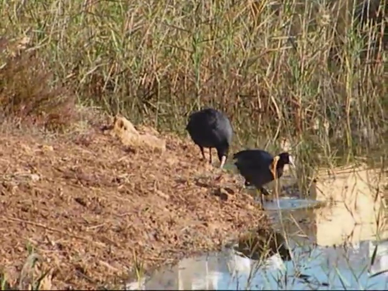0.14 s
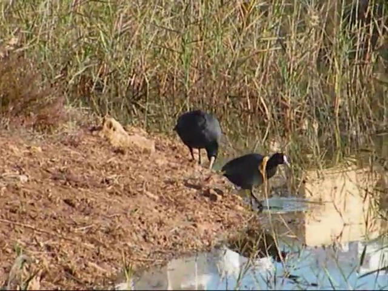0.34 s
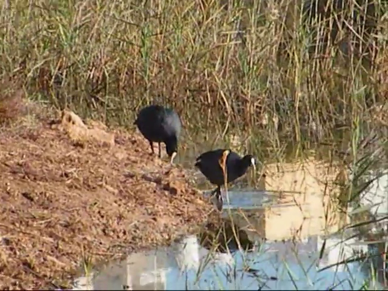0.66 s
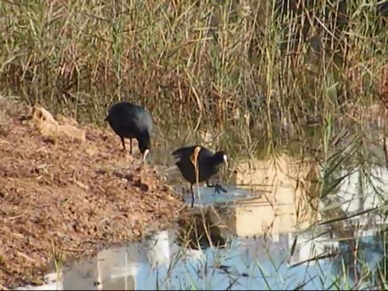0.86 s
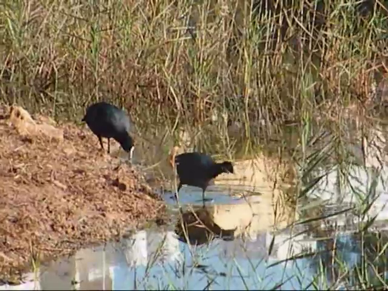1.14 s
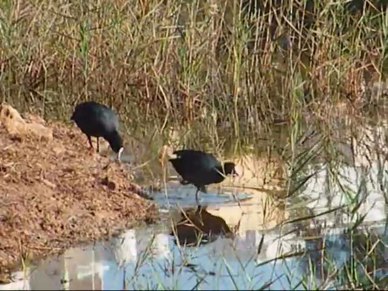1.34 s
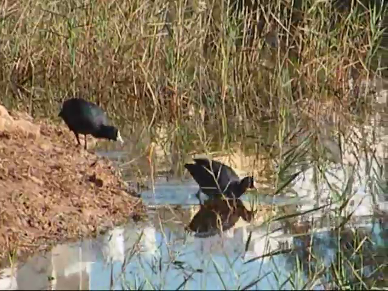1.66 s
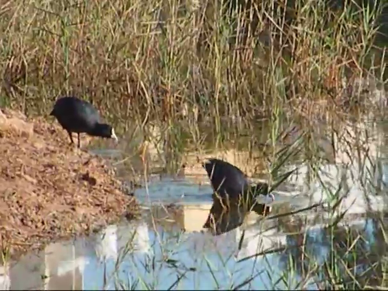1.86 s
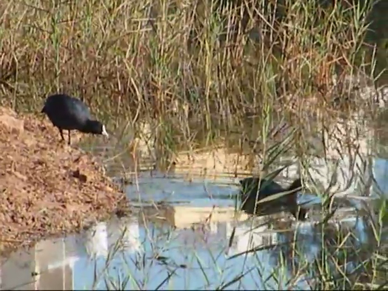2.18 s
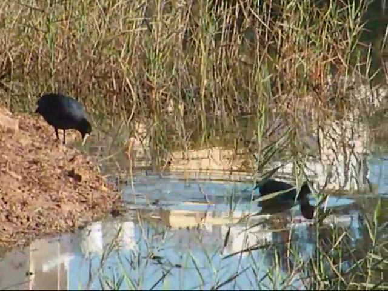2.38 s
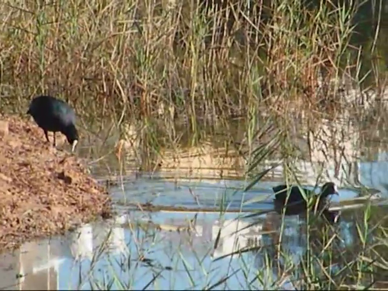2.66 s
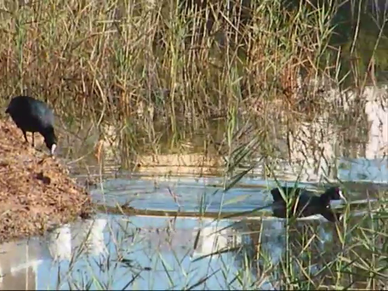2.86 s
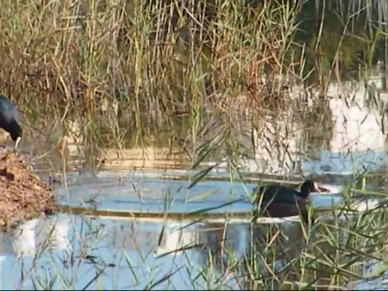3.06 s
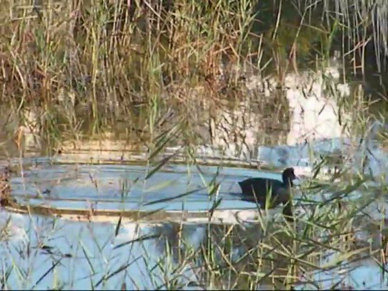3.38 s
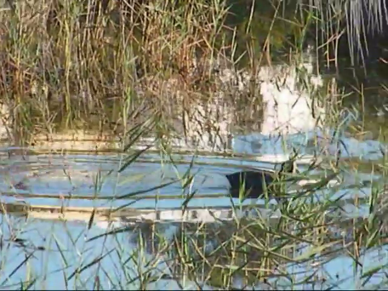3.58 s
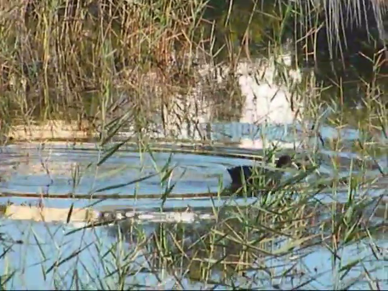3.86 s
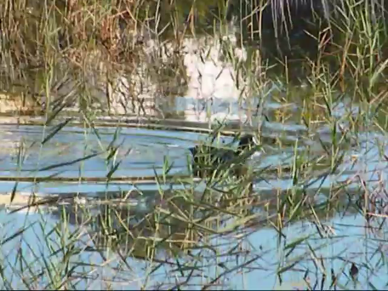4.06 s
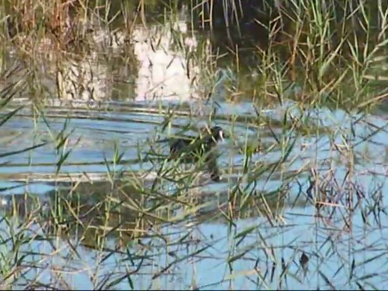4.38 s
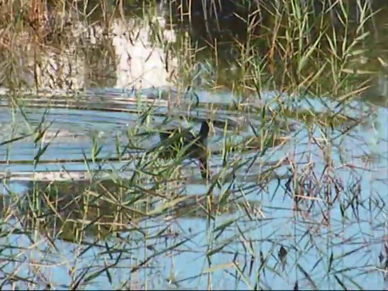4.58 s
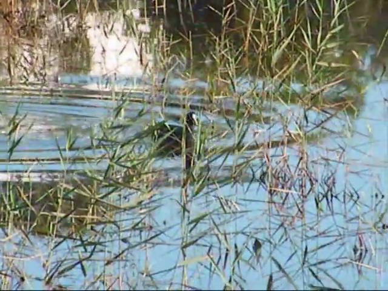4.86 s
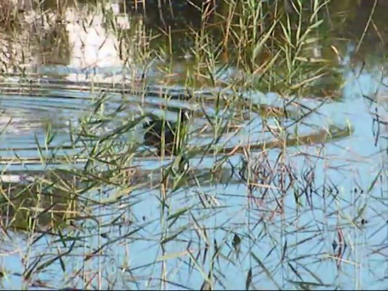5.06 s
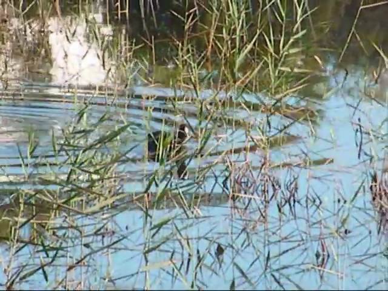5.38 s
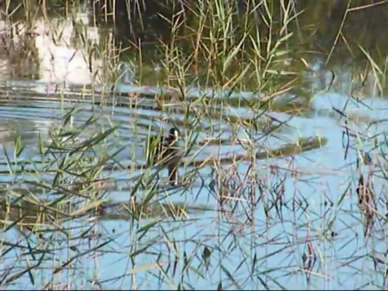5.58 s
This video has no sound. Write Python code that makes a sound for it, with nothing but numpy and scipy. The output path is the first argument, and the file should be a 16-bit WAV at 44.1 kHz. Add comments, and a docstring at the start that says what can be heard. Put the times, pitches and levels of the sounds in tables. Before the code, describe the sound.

A coot gives short, high peeps and then a few brief croaks, while water drips softly in a reedy pool.

```python
"""At the edge of a reed pool, a coot peeps in short arched whistles; later one croaks, its throat rung by
runs of uneven pulses. The calls scatter among the stems and echo off the far bank. Where a bird wades in,
water drips, gurgles and trickles as ringing air bubbles. Dry reeds tick. Small birds sing far off
at the start, while the bed of water wash, hiss, hum and rumble fades down and up again."""
import sys
import numpy as np
from scipy import signal
from scipy.fft import rfft, irfft, next_fast_len
from scipy.io import wavfile
from scipy.ndimage import uniform_filter1d

SR = 44100
rng = np.random.default_rng(int(sys.argv[2]) if len(sys.argv) > 2 else 0)


def to_wav(s):
    """Save 16-bit WAV."""
    ch = np.atleast_2d(s).T  # columns
    pcm = np.round(np.clip(ch, -1, 1) * 32767)  # PCM
    wavfile.write(sys.argv[1], SR, pcm.astype(np.int16))


N = 252693

# The coot's whistles. Each row: start in seconds, length in seconds, pitch at the crest in Hz,
# closing droop in Hz, level in dB, third harmonic against the note in dB (played 2 dB higher).
WHISTLES = [(0.851, 0.0122, 4056, 47, -53.7, -35), (1.1044, 0.0326, 4451, 322, -27.3, -30.8),
            (1.6421, 0.0159, 4537, 429, -24.3, -23.7), (1.8954, 0.0326, 4773, 428, -14, -14.8),
            (2.2, 0.011, 4150, 60, -50, -35), (2.4564, 0.0271, 4584, 325, -18.8, -18.2),
            (2.7748, 0.0119, 4127, 32, -30.6, -26.9), (3.029, 0.0263, 4632, 492, -17.6, -20.7),
            (3.6124, 0.0195, 4544, 344, -22.3, -28.5), (3.9155, 0.0207, 4567, 491, -18.8, -27.1),
            (4.221, 0.0099, 4430, 40, -48, -35), (4.4807, 0.0253, 4632, 305, -22, -21.6)]


def coot_peeps(crest=.6, swell_db=8.5, second_db=-26, air_db=-25):
    """Nearly pure whistles that arch, swell and droop; overtones grow faster than the note, air slower."""
    out = np.zeros(N)
    for start, length, hz, droop_hz, db, third_db in WHISTLES:
        progress = np.arange(-.3 * length * SR, 1.3 * length * SR) / (length * SR)
        before = np.clip(1 - progress / crest, 0, 1)
        after = np.clip((progress - crest) / .37, 0, 1.2)
        scoop_hz = 20000 * (length - .019)  # long notes come in from below, short ones from above
        pitch = hz - scoop_hz * before ** 2 - droop_hz * after ** 3.2
        phase = 2 * np.pi * np.cumsum(pitch) / SR
        edges = np.clip(np.minimum((progress + .03) / .09, (1.04 - progress) / .16), 0, 1)
        gain = smooth(undb(db - swell_db * before ** 1.6 - 3 * after ** 2) * edges, 40, 30)
        effort = np.abs(gain) / gain.max()
        husk = 1 + .9 * smooth(rng.standard_normal((2, len(gain))), 24, 18)
        second = undb(second_db) * effort ** .5 * husk[0] * np.sin(2 * phase)
        third = undb(third_db + 2) * effort ** .63 * husk[1] * np.sin(3 * phase)
        air = band(np.abs(gain) ** .7 * rng.standard_normal(len(gain)), 1000, 4100)
        add(out, start - .3 * length, gain * (np.sin(phase) + second + third) + undb(air_db) * air)
    return out


# The loud croak bursts. Each row: cue in seconds, nominal length in seconds, pitch in Hz, drive in dB.
CROAK_BURSTS = [(4.949, .004, 1020, -38), (4.992, 0.0081, 1030, -26.5), (5.002, 0.0036, 970, -28),
                (5.009, 0.0066, 926, -23.5), (5.018, 0.006, 864, -22), (5.0264, 0.0035, 1030, -30),
                (5.033, 0.0075, 860, -23.5), (5.142, .0026, 940, -32), (5.161, 0.0079, 864, -32.5),
                (5.194, .0052, 1055, -25), (5.2056, 0.011, 1005, -25.5), (5.2162, 0.0041, 1092, -21),
                (5.223, 0.0084, 888, -22), (5.234, 0.00308, 1040, -27), (5.257, .004, 910, -39),
                (5.303, 0.0023, 1050, -37), (5.526, 0.0035, 900, -39), (5.5293, 0.006, 1090, -23.5),
                (5.5378, 0.0058, 1024, -24), (5.5475, 0.0031, 956, -17), (5.554, 0.0054, 1092, -15),
                (5.5592, .0052, 1110, -13.5), (5.565, .012, 910, -18), (5.579, .007, 1390, -31)]
# The throat's resonances. Each row: centre in Hz, width in Hz, gain in dB.
FORMANTS = [(950, 680, -12.5), (1635, 247, 3.5), (2350, 630, 0), (3190, 650, -2), (4610, 1600, -23.5)]


def coot_croaks(mutter_count=70, mutter_from_s=4.94, mutter_to_s=5.33, sag=.05):
    """Runs of uneven pulses ring the throat amid a faint mutter; tighter, higher bursts are brighter."""
    pulses = np.zeros(N)
    mutter = [(mutter_from_s + (mutter_to_s - mutter_from_s) * when,
               .003 + .0051 * long, 840 + 240 * high, -38 - 7 * weak)
              for when, long, high, weak in rng.random((mutter_count, 4))]
    for cue, length, hz, db in CROAK_BURSTS + mutter:
        progress = np.linspace(0, 1, int(1.3 * length * SR))
        wobble, rasp = uniform_filter1d(rng.standard_normal((2, len(progress))), size=30)
        pitch = hz * (1 - sag * progress) * (1 + .6 * wobble)
        phase = 2 * np.pi * np.cumsum(pitch) / SR
        tilt_db = -1 + 12 * np.log2(hz / 950)  # per octave
        harmonics = sum(undb(tilt_db * np.log2(k / 2)) * np.cos(k * phase) for k in range(1, 7))
        swell = np.abs(np.sin(np.pi * progress)) ** 1.4
        add(pulses, cue - .3 * length, undb(db) * swell * harmonics * (1 + 2.2 * rasp))
    throat = sum((-1) ** k * undb(db) * signal.lfilter(*signal.iirpeak(hz, hz / width, fs=SR), pulses)
                 for k, (hz, width, db) in enumerate(FORMANTS))
    edge = band(np.abs(throat), 6800, 13000)  # a trace of the pulse edges escapes above the throat
    return undb(-3.5) * band(throat, 610, 5250) + undb(-30) * edge


def reeds_and_bank(calls, t60_s=.075, scatter_db=-26.5, echo_s=.116, echo_db=-40):
    """The stems scatter the calls into a short tail; the far bank sends back one duller echo."""
    tail = rng.standard_normal(SR // 5) * undb(-60 * np.arange(SR // 5) / SR / t60_s)
    tail /= np.sqrt(np.sum(tail ** 2))
    out = undb(scatter_db) * signal.fftconvolve(band(calls, 500, 7800), tail)[:N]
    add(out, echo_s, undb(echo_db) * band(calls, 500, 5200))
    return out


# The featured drops. Each row: start in seconds, level in dB, pitch in Hz.
DROPS = [(2.462, -27, 2060), (2.519, -38.5, 3000), (2.553, -40, 2230), (2.594, -36.5, 3560),
         (2.624, -38, 2320), (2.691, -35.5, 1530), (2.66, -40, 3700), (2.734, -33.5, 1600),
         (2.745, -34, 2420), (2.765, -38.5, 1800), (2.924, -41.5, 1120), (2.966, -43, 1580),
         (3.107, -39.5, 1810), (3.289, -39, 1510), (3.482, -46, 935), (3.53, -31, 3040), (3.551, -41, 1630),
         (3.589, -32.5, 2750), (3.596, -35.5, 1410), (3.612, -30.5, 915), (3.636, -32.5, 1500),
         (3.696, -34.5, 1170), (4.028, -37, 3050), (4.112, -41, 1160), (4.594, -35.5, 1250),
         (4.719, -35.5, 1610), (5.47, -35, 1750), (5.649, -37.5, 1470)]


def drips(spatter_count=11, small_count=16, small_from_s=2.9):
    """A drop ticks on landing and rings a bubble amid spatter; lesser drops fall as the bird wades."""
    out = np.zeros(N)
    small = [(small_from_s + (N / SR - small_from_s) * when, -40.5 - 6 * weak, 800 * 2.7 ** high)
             for when, weak, high in rng.random((small_count, 3))]
    for start, db, hz in DROPS + small:
        add(out, start, undb(db) * bubble(hz, cycles=8.2, glide=.075))
        add(out, start, undb(db - 11) * bubble(3200, cycles=1.6, glide=0))  # landing tick
        for lag, high, weak in rng.random((spatter_count, 3)):
            spatter = bubble(1300 * 3.3 ** high, cycles=4, glide=.12)
            add(out, start - .015 + .07 * lag, undb(db - 2 - 9 * weak - 8 * high ** 3) * spatter)
    return out


# Long bubbles. Each row: start in seconds, level in dB, opening pitch in Hz, ring in cycles.
LONG_BUBBLES = [(2.322, -50.5, 727, 48), (5.119, -33.5, 1730, 26), (5.42, -47, 698, 35)]


def gurgles():
    """Long-ringing bubbles that sweep steeply upward."""
    out = np.zeros(N)
    for start, db, hz, cycles in LONG_BUBBLES:
        add(out, start, undb(db) * bubble(hz, cycles, glide=.95))
    return out


# Ticks in the reeds. Each row: start in seconds, level in dB, pitch in Hz.
STEM_TICKS = [(2.446, -39, 2300), (2.547, -37, 4000), (2.64, -48, 5200), (2.766, -37, 2800),
              (2.965, -41, 2800), (3.218, -45, 3400), (3.53, -38, 4000), (3.613, -35, 2000),
              (3.69, -31, 2900), (4.267, -48, 3600), (4.392, -38, 4600), (4.412, -43, 4600),
              (4.666, -44, 4200), (4.958, -44, 4500), (5.502, -44, 4800)]


def reed_ticks(ring_cycles=2.2):
    """Dry stems tick and ring out within a few cycles."""
    out = np.zeros(N)
    for start, db, hz in STEM_TICKS:
        turns = np.arange(int(5 * ring_cycles / hz * SR)) * hz / SR
        add(out, start, undb(db) * np.exp(-turns / ring_cycles) * np.sin(2 * np.pi * turns))
    return out


# Faint low thumps and water gulps. Each row of both: start in seconds, level in dB, pitch in Hz.
LOW_THUMPS = [(1.21, -71, 194), (1.629, -74.5, 296), (1.749, -73, 62), (1.9, -70, 45), (1.999, -67.5, 200),
              (2.329, -73, 161), (2.469, -68, 75), (3.039, -76, 141), (3.129, -62, 215), (3.606, -62, 205),
              (3.919, -76, 323), (4.03, -77, 144), (4.575, -60, 159), (5.12, -73, 120), (5.56, -67, 70)]
WATER_GULPS = [(1.55, -57.5, 394), (2.5, -57, 422), (2.981, -58, 401), (3.4, -57, 430), (4.0, -56, 414),
               (4.53, -53, 446)]


def thumps_and_gulps():
    """Faint low thumps of about a cycle, several under the peeps, and low bubbles that ring longer."""
    out = np.zeros(N)
    for start, db, hz in LOW_THUMPS:
        add(out, start, undb(db) * bubble(hz, cycles=1.3, glide=0))
    for start, db, hz in WATER_GULPS:
        add(out, start, undb(db) * bubble(hz, cycles=23, glide=.038))
    return out


# Far birdsong. Each row: start in seconds, length in seconds, first and last pitch in Hz, level in dB.
SONG_NOTES = [(0, .06, 3750, 4800, -72), (.075, .024, 3780, 4760, -64), (.105, .012, 4050, 3950, -66),
              (.14, .135, 538, 516, -67), (.165, .092, 3650, 2530, -57), (.27, .015, 3050, 2572, -59),
              (.425, .037, 1820, 1780, -65), (.46, .055, 1530, 1440, -64), (.43, .07, 4800, 3900, -72),
              (.43, .025, 3600, 3530, -67), (.42, .055, 2330, 2600, -70), (.505, .04, 2480, 2450, -70),
              (.555, .052, 2450, 3080, -66)]


def songbirds():
    """Thin gliding tones that swell and fade, blurred in pitch and level by distance."""
    out = np.zeros(N)
    for start, length, first_hz, last_hz, db in SONG_NOTES:
        progress = np.linspace(0, 1, int(length * SR))
        flutter, waver = 12 * smooth(rng.standard_normal((2, len(progress))), 100, 100)
        pitch = first_hz + (last_hz - first_hz) * (1 - (1 - progress) ** 1.6)  # quick, then levels off
        phase = 2 * np.pi * np.cumsum(pitch * (1 + .013 * waver)) / SR
        swell = np.abs(np.sin(np.pi * progress)) ** .6
        add(out, start, undb(db + 4 * flutter) * swell * np.sin(phase))
    return out


def trickle(count=1600):
    """Many faint bubbles of all sizes; the small high ones are weaker, and a few stand out."""
    out = np.zeros(N)
    for when, high, ring, weak in rng.random((count, 4)):
        db = -2.5 * np.log(weak + .02) - 11 * high ** 3
        add(out, when * N / SR, undb(db) * bubble(650 * 6.5 ** high, 3 + 9 * ring ** 2, glide=.15))
    return out / np.sqrt(np.mean(out ** 2))


# The tone of the wash. Each row: frequency in Hz, relative noise density in dB.
WASH_TONE = [(160, -63.5), (280, -28.5), (437, -6), (1170, -0.5), (1680, -0.5), (1950, -4), (3290, -6.5),
             (3430, -11), (4610, -16.5), (6200, -36.5), (7000, -35), (9100, -45), (15400, -120)]
# Its level ride. Each row: time in seconds, level in dB before the opening fade.
WASH_RIDE = [(2.3, -55.5), (2.62, -53.5), (2.82, -56.5), (3.35, -55.5), (3.6, -52), (3.8, -55), (4.3, -53),
             (4.73, -56.5), (4.98, -52.5), (5.14, -50.5), (5.31, -52), (5.61, -55), (5.73, -54)]


def water_wash(t, fade_db, trickle_db=-14.5):
    """A swelling wash of reeds and water, with the trickle tucked under it."""
    gain = undb(np.interp(t, *np.transpose(WASH_RIDE)) + fade_db)
    return gain * (coloured(WASH_TONE, side_db=-24, flicker_db=.8) + undb(trickle_db) * trickle())


# The tone of the hiss and of the rumble. Each row: frequency in Hz, relative noise density in dB.
HISS_TONE = [(1470, -31), (2500, -12), (5520, -6.5), (6110, -18), (8730, -7), (9360, -7.5), (14200, 8.5),
             (16000, 2)]
RUMBLE_TONE = [(12, 4.5), (25, 1), (40, -12.5), (70, -20), (110, -17.5), (200, -19.5), (300, -19.5),
               (400, -35)]


def hiss_and_rumble(fade_db):
    """Fine hiss over a restless rumble; each follows only part of the fade."""
    hiss = undb(-64 + .52 * fade_db) * coloured(HISS_TONE, side_db=-11, flicker_db=.2)
    rumble = undb(-80 + .15 * fade_db) * coloured(RUMBLE_TONE, side_db=-14, flicker_db=4)
    return hiss + rumble


def low_hum(t, fade_db, hz=150, lead_rad=.5):
    """A faint, wavering mains-like tone that reaches the left side first."""
    phase = 2 * np.pi * hz * t + lead_rad * np.array([[.5], [-.5]])
    return undb(-88.5 + fade_db + 1.9 * walk(5)) * np.sin(phase)


def bubble(hz, cycles, glide):
    """A damped ring, as of an air pocket; glide lifts its pitch as it dies."""
    turns = np.arange(int(3 * cycles / hz * SR)) * hz / SR
    envelope = (1 - np.exp(-turns / .63)) * np.exp(-2 * turns / cycles)
    return envelope * np.sin(2 * np.pi * (turns + glide * turns ** 2 / (2 * cycles)))


def coloured(tone, side_db, flicker_db):
    """Stereo noise of rms near 1 in half-octave bands, each flickering on its own."""
    size = next_fast_len(N)
    hz = np.arange(1, size // 2 + 2) * SR / size
    spectrum = rfft(rng.standard_normal((2, size))) * undb(on_log(hz, tone))
    out = 0
    for octave in np.arange(np.log2(tone[0][0]), np.log2(tone[-1][0]) + .5, .5):
        window = np.clip(1 - 2 * np.abs(np.log2(hz) - octave), 0, 1)
        out = out + irfft(spectrum * window, size)[:, :N] * undb(flicker_db * walk(14))
    mid, side = out / np.sqrt(np.mean(out ** 2))
    return np.array([mid + undb(side_db) * side, mid - undb(side_db) * side])


def walk(rate):
    """Random levels held 1 / rate seconds and smoothed; spread near 1."""
    hold = int(SR / rate)
    return 1.3 * smooth(np.repeat(rng.standard_normal(N // hold + 1), hold), hold, hold)[:N]


def smooth(x, first, second):
    """Two moving averages, widths in samples."""
    return uniform_filter1d(uniform_filter1d(x, first), second)


def band(x, lo_hz, hi_hz):
    """Steep band-pass."""
    return signal.sosfilt(signal.butter(4, (lo_hz, hi_hz), "band", fs=SR, output="sos"), x)


def on_log(hz, curve):
    """Read a curve at hz along a log-frequency axis."""
    freqs, values = np.transpose(curve)
    return np.interp(np.log(hz), np.log(freqs), values)


def undb(db):
    """Decibels to gain."""
    return 10 ** (np.asarray(db) / 20)


def add(out, start_s, x):
    """Mix x into out from start_s."""
    i = int(start_s * SR)
    out[i:i + len(x)] += x[:max(N - i, 0)]


# The bed's opening fade, down and up again. Each row: time in seconds, gain in dB.
BED_FADE = [(0, -7.5), (.11, -9.5), (.45, -16), (.7, -23), (.82, -25), (.89, -16), (1.1, -8), (1.25, -6),
            (1.64, 1)]


def scene():
    """Birds, drips and faint thumps in the centre, over a narrow stereo bed."""
    t = np.arange(N) / SR
    fade_db = np.interp(t, *np.transpose(BED_FADE))
    calls = coot_peeps() + coot_croaks()
    birds = calls + reeds_and_bank(calls) + songbirds()
    water_and_reeds = band(drips() + gurgles() + reed_ticks(), 400, 5900)
    bed = low_hum(t, fade_db) + water_wash(t, fade_db) + hiss_and_rumble(fade_db)
    return birds + water_and_reeds + thumps_and_gulps() + bed


# Phase between the microphone ports. Each row: frequency in Hz, left lead in radians (negative lags).
PORT_PHASE = [(2500, 0), (4500, -.17), (9200, -.43), (14000, -.64), (16000, -.75)]


def record(dry, top_hz=15800):
    """Two close microphone ports hear the treble a little apart in time; the top is cut steeply."""
    size = next_fast_len(N)
    lead = on_log(np.arange(1, size // 2 + 2) * SR / size, PORT_PHASE)
    ports = irfft(rfft(dry, size) * np.exp(.5j * np.array([lead, -lead])), size)[:, :N]
    balance = undb([[.12], [-.12]])
    return signal.sosfilt(signal.ellip(10, .2, 70, top_hz, fs=SR, output="sos"), ports * balance)


dry = scene()
out = record(dry)
to_wav(out)
```